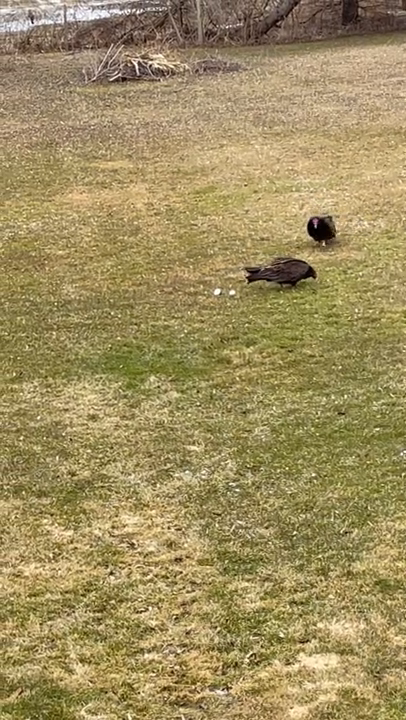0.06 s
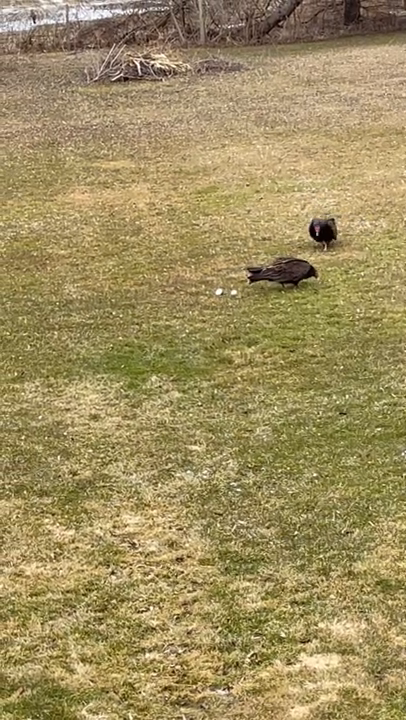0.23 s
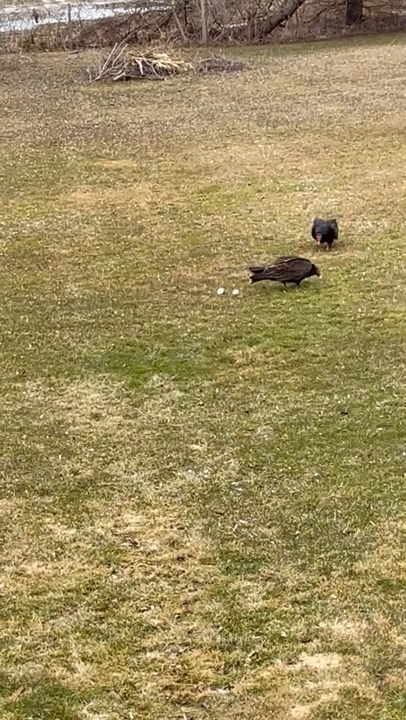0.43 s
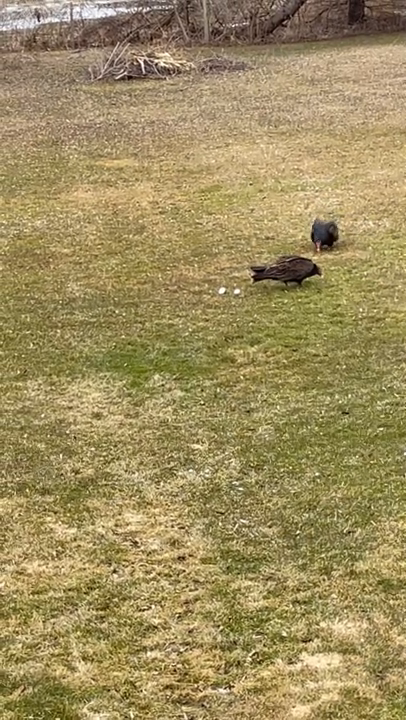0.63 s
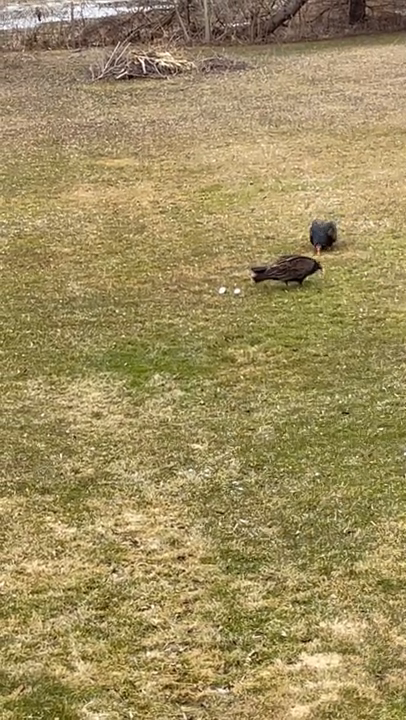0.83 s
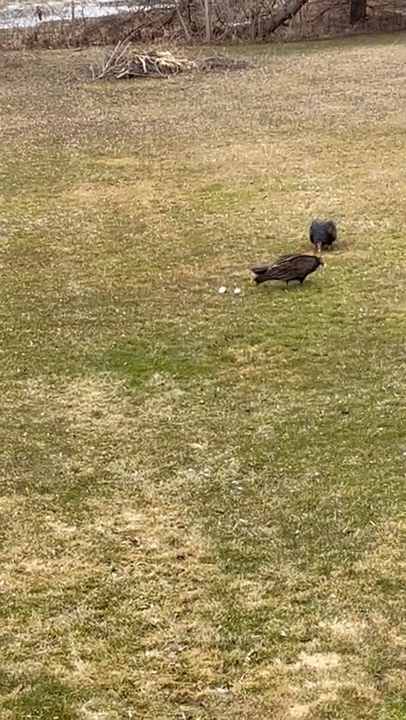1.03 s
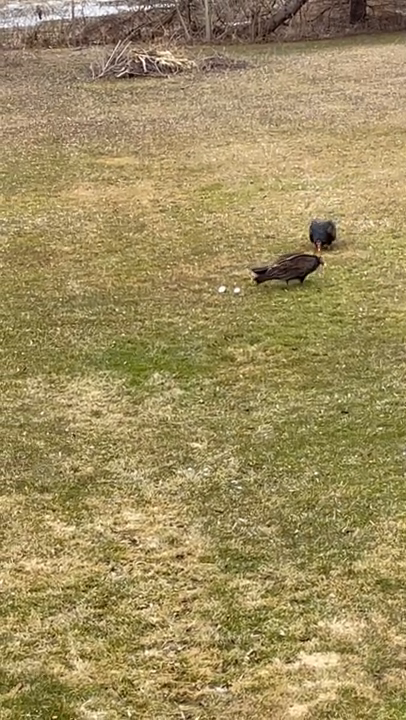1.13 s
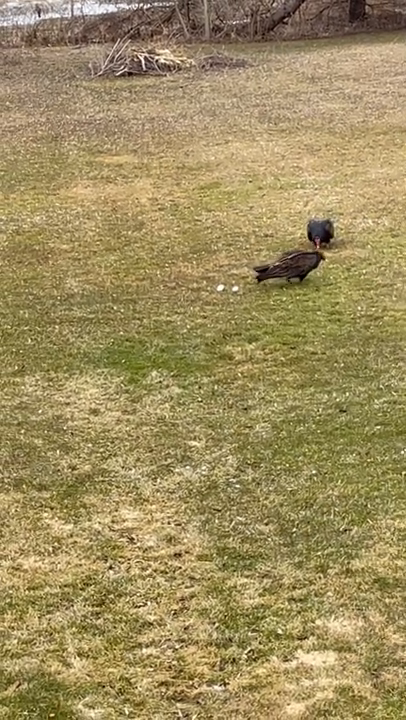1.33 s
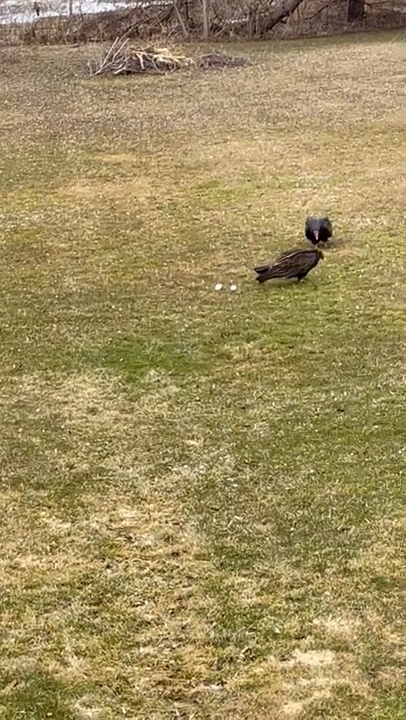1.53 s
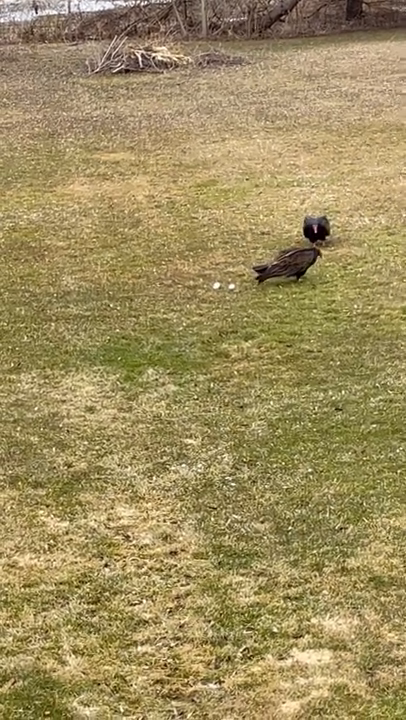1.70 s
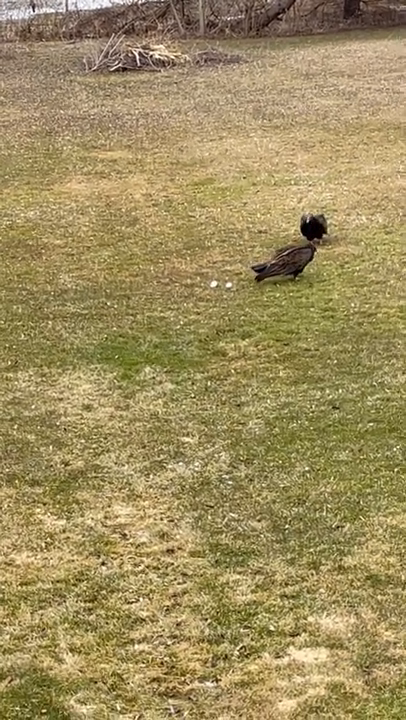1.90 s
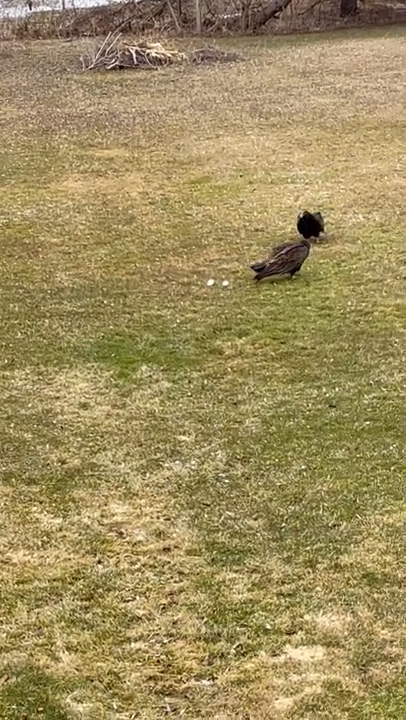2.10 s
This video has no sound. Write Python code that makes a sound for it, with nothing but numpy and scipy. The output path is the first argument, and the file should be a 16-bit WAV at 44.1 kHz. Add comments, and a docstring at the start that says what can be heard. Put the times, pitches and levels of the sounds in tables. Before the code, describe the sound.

Deep lumpy wind gust buffets the microphone outdoors, then eases to lighter air; a muffled distant roar like traffic continues throughout, while grainy close rustles, dry ticks and faint bumps fill the second half.

```python
"""Over a lawn: wind buffets a hand-held microphone, above a dull distant roar like far traffic.
Wind is steadied low noise plus falling-pitch thumps; the roar is shaped noise that swells in patches.
In the second half something close by, likely a sleeve, rustles in a few strokes of grainy noise.
Small ticks are noise snaps, soft handling knocks are decaying body modes; a faint hiss runs throughout."""
import sys
import numpy as np
from scipy import signal
from scipy.fft import rfft, irfft
from scipy.io import wavfile
from scipy.ndimage import uniform_filter1d

SR = 44100
rng = np.random.default_rng(int(sys.argv[2]) if len(sys.argv) > 2 else 0)


def wrap_up_sound(samples):
    """Save the sound to the file named by the first command line argument, as 16-bit audio."""
    columns = np.atleast_2d(samples).T
    # keep every value between -1 and 1, then stretch to whole-number steps
    tamed = np.clip(columns, -1, 1)
    steps = np.round(tamed * 32767).astype(np.int16)
    wavfile.write(sys.argv[1], SR, steps)


N = 94815
T, HZ = np.arange(N) / SR, np.fft.rfftfreq(N, 1 / SR)

# likeness of the roar at the two ports: freq_hz, likeness (clipped to 0-1)
ROAR_LIKENESS = [(100, 1), (300, 0.97), (600, 0.9), (850, 0.96), (1050, 0.46), (1300, 0.98), (2000, 0.5),
                 (6000, 3.5)]
# roar balance: freq_hz, left_minus_right_db
ROAR_BALANCE = [(150, 1.5), (350, -1.3), (700, -2.5), (1200, -3), (1700, -2), (2200, 0.5)]


def amp(db):
    """Decibels to gain."""
    return 10 ** (np.asarray(db) / 20)


def unit(x):
    """Scales to rms 1."""
    return x / np.sqrt(np.mean(x ** 2) + 1e-20)


def over_hz(points):
    """Reads a table on a log-frequency axis."""
    f, value = np.transpose(points)
    return np.interp(np.log(HZ + 1), np.log(f), value)


def level(points):
    """Gain over time from a level curve."""
    return amp(np.interp(T, *np.transpose(points)))


def drift(hz):
    """Slow random motion of rms 1."""
    lowpass = np.exp(-(HZ / hz) ** 2)
    return unit(irfft(rfft(rng.standard_normal(N)) * lowpass, N))


def noise_spectra():
    """Two independent white noise spectra."""
    return rfft(rng.standard_normal((2, N)))


def ports(left, right):
    """Two spectra become sound at the two microphone ports, with a phase lead between them."""
    # lead of the left port: freq_hz, lead_rad
    left_lead = [(100, 0), (500, -.15), (950, -.45), (1200, -.05), (2000, .05), (2800, .8), (3600, .05),
                 (4900, .15), (6300, 1.5), (8800, 2.4), (9900, 3.1), (13500, 3.2), (15700, 4.4)]
    half_turn = np.exp(.5j * over_hz(left_lead))
    return irfft(np.array([left * half_turn, right / half_turn]), N)


def pair(a, b, same):
    """Two noise spectra, made alike to the given degree."""
    same = np.clip(same, 0, 1)
    return np.array([a, same * a + np.sqrt(1 - same ** 2) * b])


def rumble(colour):
    """Low turbulence of even strength; the ports differ only a little, more so in the smaller eddies."""
    steady_s, apart_db = 0.049, -31.5
    z = noise_spectra() * amp(over_hz(colour))
    common = irfft(z[0], N)
    apart = irfft(z[1] * np.minimum(HZ, 250) ** .5, N)
    power = uniform_filter1d(common ** 2, size=round(steady_s * SR))
    common = unit(common / np.sqrt(power + 1e-12))
    return common + np.outer([1, -1], amp(apart_db) * unit(apart))


def buffets():
    """Single eddies thump the microphone, each falling in pitch as it passes."""
    # start_s (centre), peak_db, pitch_hz (at centre), fall_octaves_per_cycle
    eddies = [(.393, -35, 230, .3), (0.405, -26.5, 82, 0.51), (0.462, -36.5, 100, 0.66),
              (.507, -29.5, 121.5, 0.45), (.537, -28, 76.4, .3), (0.582, -19.5, 76.6, .6),
              (.626, -36.5, 230, 0.53), (0.644, -24.5, 99.6, 0.41), (.685, -33, 285, .2),
              (0.691, -22.5, 112, .3), (.706, -14.5, 112.5, 1), (0.783, -31, 186, .6),
              (0.792, -21, 78.5, 0.7), (.836, -27.5, 71.7, .1), (.931, -28, 90, .5),
              (.978, -30.5, 96.5, 0.17), (1.031, -38, 70, 0.33), (1.258, -36, 82.4, .3),
              (1.388, -40.5, 74, .3), (1.672, -34.5, 97, .3), (1.887, -32.5, 130, 0.43)]
    width_cycles = 0.75
    out = np.zeros(N)
    for s, db, hz, fall in eddies:
        stretch = np.log(2) * max(fall, 1e-3)
        cycles = np.log(np.maximum(1 + stretch * hz * (T - s), 1e-9)) / stretch
        out += amp(db) * np.exp(-(cycles / width_cycles) ** 2) * np.cos(2 * np.pi * cycles)
    return out


def wind():
    """A deep lumpy gust gives way to lighter air, with thumping eddies on top."""
    # wind on the microphone, before the air gains: time_s, level_db
    wind_level = [(0, -48), (.06, -40), (.115, -39.5), (.15, -43.5), (.22, -35.5), (.33, -42.5),
                  (.4, -33.5), (.47, -32.5), (.53, -33.5), (.62, -36.5), (.68, -32.5), (.725, -30.5),
                  (.755, -39), (.79, -33), (.835, -34.5), (.875, -41.5), (.935, -32.5), (1.03, -38.5),
                  (1.06, -45), (1.09, -40), (1.15, -53), (1.21, -44.5), (1.27, -41), (1.31, -42),
                  (1.35, -52.5), (1.6, -50), (1.66, -48), (1.75, -47.5), (1.84, -43), (1.89, -41),
                  (1.96, -55), (2.015, -39), (2.075, -49), (2.15, -39)]
    # rumble in the gust: freq_hz, density_db_per_hz (relative)
    gust_colour = [(10, -47), (27, -18), (45, 3.5), (78, 1), (130, -9.5), (190, -19), (300, -23.5),
                   (500, -45), (1200, -84)]
    # rumble in the lighter air: freq_hz, density_db_per_hz (relative)
    breeze_colour = [(10, -44), (27, -9.5), (45, -3), (80, 2.5), (130, -2.5), (190, -9.5), (300, -11.5),
                     (500, -36.5), (1200, -77)]
    gust_db, breeze_db = -1, -0.5
    handover_s, fade_s = 1.106, 0.17  # fade is centred on the handover
    lump_hz, lump_db = 24, 1.46
    low_cut_hz = 21
    after = np.clip((T - handover_s) / fade_s + .5, 0, 1)
    gust = amp(gust_db) * np.sqrt(1 - after) * rumble(gust_colour)
    breeze = amp(breeze_db) * np.sqrt(after) * rumble(breeze_colour)
    lumps = amp(lump_db * drift(lump_hz))
    air = (gust + breeze) * level(wind_level) * lumps + buffets()
    low_cut = 1 / np.sqrt(1 + (low_cut_hz / (HZ + 1)) ** 8)
    return irfft(rfft(air) * low_cut, N)


def roar():
    """Dull far noise, mostly a little to the right, swelling separately in half-octave patches."""
    # freq_hz, density_db_per_hz (relative)
    roar_colour = [(30, -8.5), (120, -2.5), (250, -3), (400, -4), (470, -3), (515, 0), (545, -2), (580, 2),
                   (630, -3), (720, 2.5), (830, -1), (1000, -2.5), (1300, -7.5), (1600, -14), (2000, -19.5),
                   (2600, -32), (3600, -46.5), (6000, -68.5)]
    # time_s, level_db (450-1600 Hz band)
    roar_level = [(0, -53), (.22, -52), (.45, -52.5), (.56, -52), (.65, -50.5), (.73, -49.5), (.85, -50.5),
                  (.92, -50.5), (1.03, -51), (1.24, -52), (1.42, -48.5), (1.62, -50), (1.71, -47.5),
                  (1.93, -47.5), (2.07, -50), (2.15, -48.5)]
    patch_db, patch_hz = 1, 9.1
    z = pair(*noise_spectra(), over_hz(ROAR_LIKENESS)) * amp(over_hz(roar_colour))
    z = z * amp(np.outer([.5, -.5], over_hz(ROAR_BALANCE)))
    core = (HZ > 450) & (HZ < 1600)
    z = z / irfft(z.mean(0) * core, N).std()
    # half octaves above 250 Hz; the end bands take everything beyond
    place = np.clip(2 * np.log2((HZ + 1) / 250), 0, 7)
    out = np.zeros((2, N))
    for k in range(8):
        band = np.maximum(1 - abs(place - k), 0)
        out += ports(*(z * band)) * amp(patch_db * drift(patch_hz))
    return out * level(roar_level)


def hiss():
    """Smooth steady faint noise of the air and the microphone."""
    # freq_hz, density_db_per_hz (relative)
    hiss_colour = [(500, 1), (3500, -1), (5000, -0.5), (8000, -3.5), (11500, -7.5), (13500, -16),
                   (16000, -15)]
    hiss_db = -88
    z = pair(*noise_spectra(), 0.98) * amp(over_hz(hiss_colour))
    return amp(hiss_db) * unit(ports(*z))


def surges():
    """Brief, loose swells of hollow noise within the roar."""
    # centre_s, level_db, half_length_s, pitch_hz
    swells = [(.56, -52, 0.032, 980), (0.727, -47.5, 0.049, 730), (0.936, -48.5, 0.029, 780)]
    width_hz = 170
    out = np.zeros((2, N))
    for s, db, half_s, hz in swells:
        band = np.exp(-((HZ - hz) / width_hz) ** 2)
        z = pair(*noise_spectra(), over_hz(ROAR_LIKENESS)) * band
        z = z * amp(np.outer([.5, -.5], over_hz(ROAR_BALANCE)))
        out += amp(db) * unit(ports(*z)) * np.exp(-((T - s) / half_s) ** 2)
    return out


def rustle(stroke, colour):
    """Fibres catch and slip: dense tiny snaps in a smooth hiss, following the stroke."""
    # likeness at the two ports: freq_hz, likeness (0-1)
    likeness = [(3000, .92), (4200, .98), (5800, .89), (9000, .89), (9800, .997), (13300, .997),
                (14000, .82)]
    grains_per_s, grain_spread_db, grain_share = 3000, 1, 0.3  # share of power
    rustle_db, flutter_db, flutter_hz = -1, 1.4, 45
    hits = rng.random(N) < grains_per_s / SR
    strength = amp(grain_spread_db * np.minimum(rng.exponential(1, N), 4))
    snaps = rng.standard_normal((2, N)) * hits * strength
    smooth = rng.standard_normal((2, N))
    drive = np.sqrt(grain_share) * unit(snaps) + np.sqrt(1 - grain_share) * smooth
    z = pair(*rfft(drive), over_hz(likeness)) * amp(over_hz(colour))
    x = ports(*z)
    # level reference: rms of the mid signal, 3.5-9 kHz
    core = (HZ > 3500) & (HZ < 9000)
    x = x / irfft(rfft(x.mean(0)) * core, N).std()
    touching = (T > stroke[0][0]) & (T < stroke[-1][0] + .02)
    return x * level(stroke) * touching * amp(rustle_db + flutter_db * drift(flutter_hz))


def ticks():
    """Each tick is a sharp snap of noise around its own pitch: a dry crack if wide, a ping if narrow."""
    # start_s, level_db (over 1 ms), pitch_hz, width_octaves
    snaps = [(.672, -67.5, 4200, .6), (.716, -64.5, 4080, .35), (.947, -71.5, 5530, .8),
             (1.008, -65.5, 9200, .15), (1.1713, -49.5, 2890, 0.84), (1.245, -60.5, 5200, .6),
             (1.29, -61.5, 3540, 1), (1.737, -51, 7500, 0.51), (1.9048, -52.5, 5200, .4),
             (1.9394, -46, 4800, .38), (2.136, -42, 13600, .6)]
    decay_s, snap_db = 0.00066, -16.5
    out, t = np.zeros(N + 2048), np.arange(1024) / SR
    half = len(t) // 2
    f, one_ms = np.fft.rfftfreq(len(t), 1 / SR), SR / 1000
    for s, db, hz, octaves in snaps:
        burst = np.roll(rng.standard_normal(len(t)) * np.exp(-t / decay_s), half)
        body = 1 / (1 + (np.log2((f + 1) / hz) / octaves) ** 2)
        bright = amp(snap_db) * f / (f + hz)
        tick = irfft(rfft(burst) * (body + bright))
        start = round(s * SR) - half
        out[start:start + len(t)] += amp(db) * tick / np.sqrt(np.sum(tick ** 2) / one_ms)
    z = rfft(out[:N])
    return ports(z, z)


def knocks():
    """Handling bumps ring the body briefly; softer contact leaves the upper modes quiet."""
    # start_s, strength_db, dullness_db_per_octave
    bumps = [(1.1721, -30.5, 4), (1.29, -34.5, 1), (1.585, -39.5, 15.5), (1.729, -42, 14), (2.003, -42, 19)]
    # body modes: pitch_hz, level_db, t60_s
    modes = [(232, -2, 0.041), (329, -4.5, 0.047), (460, -5.5, 0.056), (623, -1.5, 0.031),
             (800, -0.5, 0.044), (1030, -13, 0.035), (1440, -18, 0.015)]
    rise_s = 0.00076
    pivot_hz = modes[1][0]  # dullness leaves this mode unchanged
    out = np.zeros(N)
    for s, strength_db, dull_db in bumps:
        t = np.maximum(T - s, 0)
        ring = np.zeros(N)
        for hz, db, t60 in modes:
            mode_db = db - dull_db * np.log2(hz / pivot_hz) - 60 * t / t60
            ring += amp(mode_db) * np.sin(2 * np.pi * hz * t)
        out += amp(strength_db) * (1 - np.exp(-t / rise_s)) * ring
    return out


def scene():
    """Wind and handling at the microphone, over the far roar."""
    # strokes, before the rustle gain: time_s, level_db
    # a light brush with a bright flick in it, then a firmer rub
    brush = [(.64, -96), (.9, -95), (.96, -87.5), (1.04, -88), (1.1, -77), (1.135, -71), (1.165, -69),
             (1.183, -66), (1.205, -73), (1.255, -72.5), (1.28, -80.5), (1.315, -72.5), (1.37, -81.5),
             (1.46, -90)]
    flick = [(1.187, -82), (1.19, -67), (1.2, -76), (1.22, -89)]
    rub = [(1.464, -99), (1.478, -65), (1.495, -63.5), (1.57, -67), (1.595, -75), (1.635, -78.5),
           (1.678, -66), (1.745, -67), (1.794, -70.5), (1.83, -63.5), (1.92, -61.5), (1.97, -66.5),
           (2.04, -66.5), (2.085, -72), (2.125, -63), (2.15, -64.5)]
    # stroke colours: freq_hz, density_db_per_hz (relative)
    brush_colour = [(300, -5.5), (1500, 9), (3000, 3.5), (3700, 0.5), (4500, 3), (5000, -2), (6600, -3),
                    (7800, -0.5), (9600, -3), (11000, -7.5), (12500, -12.5), (15800, -7.5)]
    flick_colour = [(3000, -14), (7500, -5), (9500, 1), (11800, -1), (13500, -15)]
    rub_colour = [(300, -6), (1500, -9), (2500, -0.5), (4200, -1.5), (5200, 2), (6200, 2), (8300, 2.5),
                  (10000, -5.5), (12500, -11.5), (14000, -8), (15600, -6.5)]
    background = wind() + roar() + hiss() + surges()
    strokes = rustle(brush, brush_colour) + rustle(flick, flick_colour) + rustle(rub, rub_colour)
    return background + strokes + ticks() + knocks()


def record(dry):
    """The recorder's band limit."""
    edge_hz = 15900
    taps = signal.firwin(511, edge_hz, window=("kaiser", 9), fs=SR)
    return signal.oaconvolve(dry, taps[None], "same")


dry = scene()
out = record(dry)
wrap_up_sound(out)
```